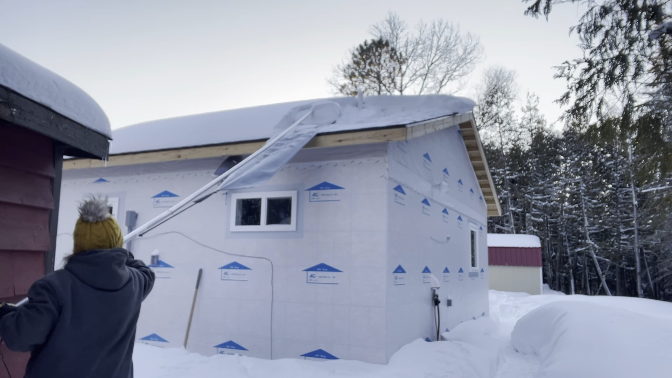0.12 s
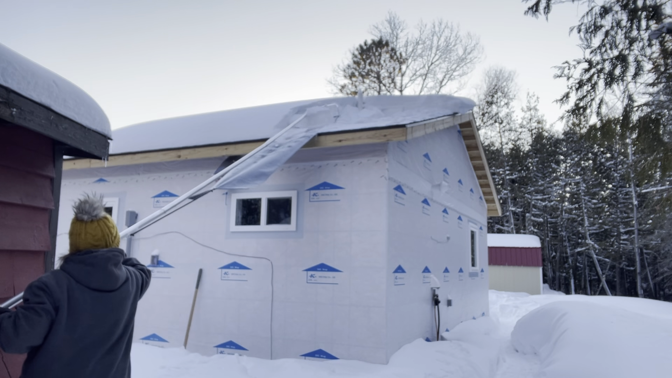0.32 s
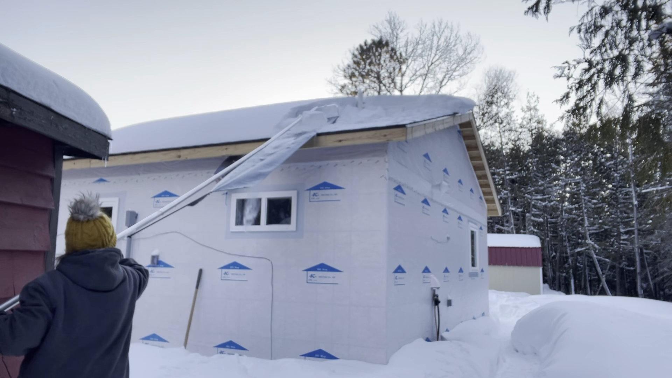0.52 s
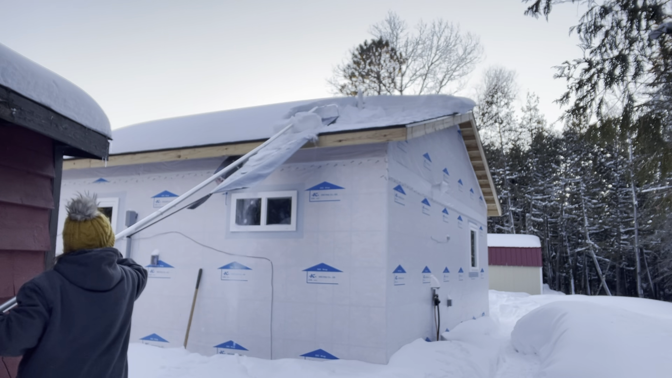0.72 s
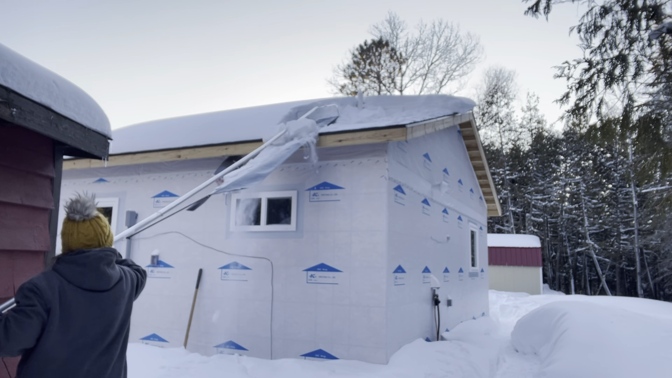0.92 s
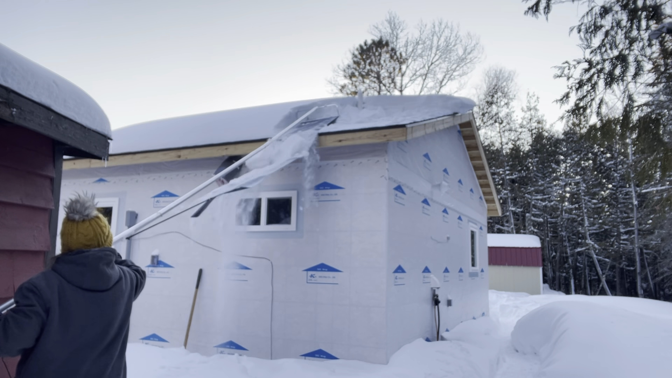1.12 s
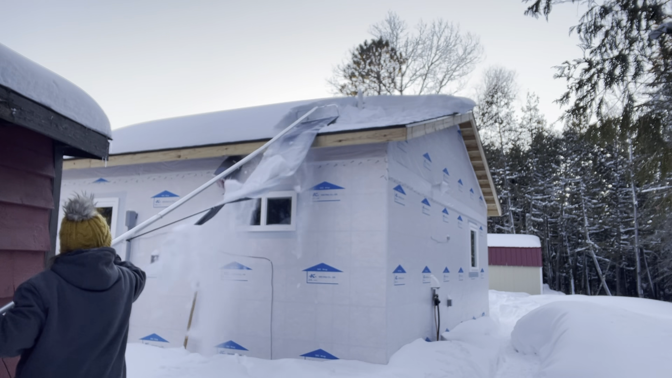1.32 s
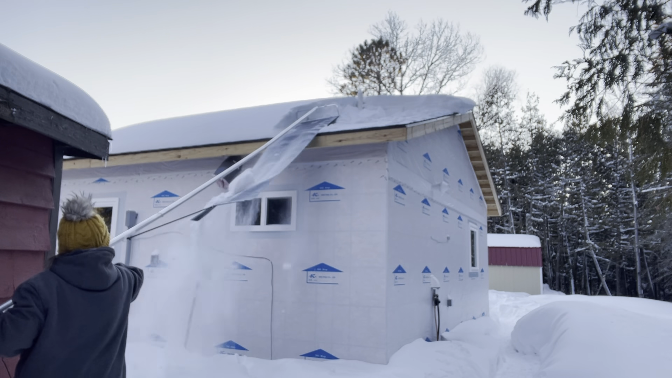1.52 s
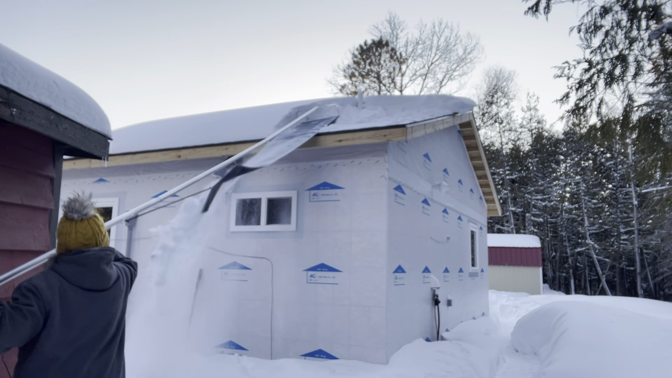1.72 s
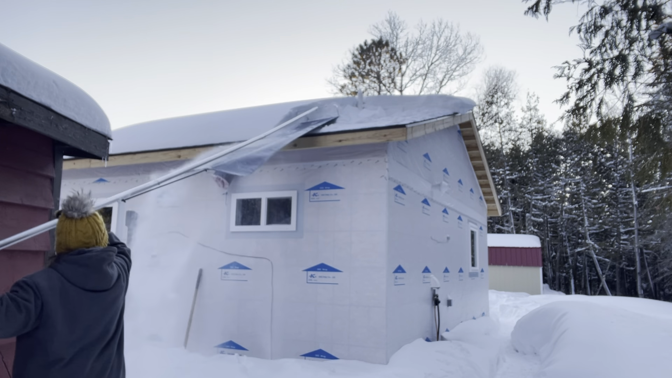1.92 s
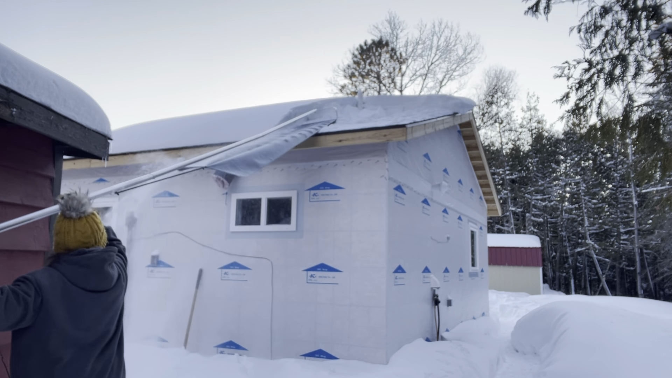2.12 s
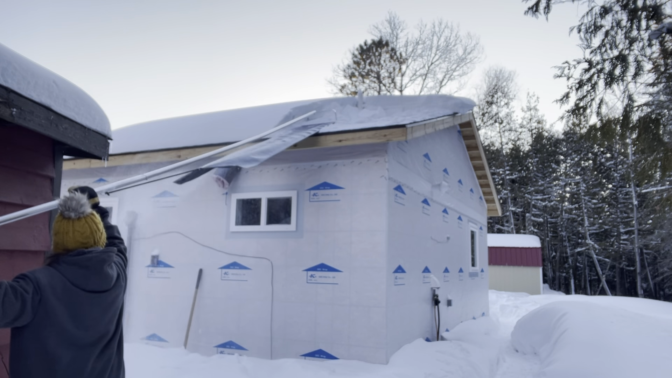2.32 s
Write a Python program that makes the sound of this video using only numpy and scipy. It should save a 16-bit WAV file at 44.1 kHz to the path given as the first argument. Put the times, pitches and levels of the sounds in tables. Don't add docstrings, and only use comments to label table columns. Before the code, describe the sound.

Snow slides down a roof rake's plastic tarp with a swelling hiss, then thumps softly down

```python
import sys
import numpy as np
from scipy import signal
from scipy.fft import rfft, irfft, next_fast_len
from scipy.io import wavfile
from scipy.ndimage import uniform_filter1d, map_coordinates

SR = 44100
rng = np.random.default_rng(int(sys.argv[2]) if len(sys.argv) > 2 else 0)


def wrap_up_sound(samples):
    columns = np.atleast_2d(samples).T
    tamed = np.clip(columns, -1, 1)
    steps = np.round(tamed * 32767).astype(np.int16)
    wavfile.write(sys.argv[1], SR, steps)


def gain_from_db(level_db):
    decades = np.asarray(level_db, float) / 20
    return 10 ** decades


N = 108045

# (frequency [Hz], level [dB])
AIR_SPECTRUM = [(18, -55), (30, -22), (60, -12), (110, -3.5), (170, -7), (300, -17), (700, -20),
                (2500, -29)]
# (frequency [Hz], t60 [s])
YARD_T60 = [(60, 0.18), (300, 0.089), (3000, 0.033)]
# (frequency [Hz], level [dB])
IMPACT_TILT = [(60, 1.3), (150, 2.2), (300, 4), (700, 3), (1500, .3), (4000, -.5)]
# (time [s], level [dB])
PATTER_LEVEL = [(1.5, -91), (1.6, -63.5), (1.74, -57), (1.82, -54), (1.9, -96), (2.04, -53), (2.17, -54),
                (2.27, -70), (2.45, -72)]
# (frequency [Hz], level [dB])
PATTER_SPECTRUM = [(20, -2), (45, 0), (80, -12), (200, -8), (400, -15), (800, -20), (2000, -88)]
# (frequency [Hz], likeness [0-1])
GROUND_LIKENESS = [(60, 0.73), (400, 1), (1000, 0.77), (3000, 0.7)]
# (time [s], level [dB], rise [s], fall t60 [s], left port early [ms])
LUMP_BURSTS = [
    (1.764, -43, 0.04, 0.06, -0.1),
    (1.982, -47, .003, 0.056, 0.39),
    (2.105, -48, 0.02, 0.08, 0.26),
    (2.13, -48, .03, .25, .26),
]
# (frequency [Hz], level [dB])
CRUNCH_SPECTRUM = [(60, -28), (200, -1), (700, -4), (1300, -15), (1900, -8), (2500, -11), (5500, -32),
                   (16000, -50)]
# (time [s], level [dB], rise [s], fall t60 [s], left port early [ms])
CRUMB_SPRAYS = [
    (.374, -47, .008, .07, 0.24),
    (2.118, -50, 0.025, .06, 0.28),
    (2.13, -47, 0.02, .075, 0.28),
    (2.32, -55.5, 0.085, 0.15, .25),
]
# (frequency [Hz], level [dB])
CRUMB_SPECTRUM = [(200, -23), (700, -2), (1500, 0), (3000, -4), (4100, -11), (5000, -25), (16000, -35)]
# (time [s], peak [dB], pitch [Hz], t60 [s])
LUMP_THUDS = [(1.43, -55.5, 70, 0.041), (1.597, -52.5, 55, 0.1), (1.709, -48, 70.6, .07),
              (1.733, -40.5, 68.7, 0.075), (1.755, -38, 136, 0.041), (1.786, -42.5, 55, 0.059),
              (1.86, -61, 55, .09), (1.911, -56, 65, .06), (1.965, -55, 60, 0.076), (2.008, -47, 55, .09),
              (2.058, -43, 97, 0.046), (2.069, -44, 62, .06), (2.094, -27.5, 158, 0.014),
              (2.104, -20, 60, 0.056), (2.1338, -35, 94, 0.069), (2.151, -54, 196, .04),
              (2.168, -53, 190, 0.033), (2.1745, -37, 58.4, .11), (2.19, -54.5, 218, .04),
              (2.215, -43, 55, 0.054), (2.239, -50, 70, .05), (2.284, -50, 60, 0.038), (2.34, -61, 55, .07),
              (2.41, -66, 70, .07)]
# (time [s], peak [dB], pitch [Hz], t60 [s], left port early [ms])
TARP_KNOCKS = [(.051, -39, 305, 0.048, 0.59), (0.172, -48, 240, 0.057, 0.29), (.372, -36.5, 1450, 0.033, 0),
               (.383, -42.5, 808, 0.084, -0.081), (.487, -49.5, 660, 0.064, 0),
               (0.511, -38, 1350, 0.032, 0), (.608, -35.5, 1550, 0.034, 0), (.645, -40, 1330, 0.046, 0),
               (.682, -39, 1446, .06, 0), (1.7522, -28, 640, .014, 0), (1.7535, -33, 300, .045, 0),
               (1.7515, -37, 1250, .035, 0), (1.757, -39, 900, .03, 0), (1.697, -33, 1940, .03, 0),
               (1.69, -44.5, 603, 0.069, 0), (1.7636, -32, 340, 0.067, 0.37), (1.763, -33, 1330, .045, 0),
               (1.764, -38, 800, .035, 0), (1.766, -39, 1750, .03, -0.047), (1.98, -26.5, 321, 0.019, 0.64),
               (1.977, -45, 600, 0.021, 0.27), (2.099, -39, 480, 0.063, .45), (2.124, -38, 431, 0.13, 0.49),
               (2.129, -40, 1040, 0.045, 0.28), (2.134, -42, 690, 0.027, 0.37),
               (2.268, -56, 770, .05, 0.16), (2.279, -56, 700, .04, .2), (2.29, -54, 800, 0.04, .25),
               (2.316, -42.5, 717, 0.045, 0.4)]
# (time [s], scrape level [dB], lowest tarp pitch [Hz], powder level [dB])
SLIDE_COURSE = [(0, -50.5, 244, -49), (0.2, -47, 204, -50), (.33, -46, 284, -49), (.4, -45, 594, -47.5),
                (.45, -45, 1010, -48), (.66, -44.5, 1250, -45.5), (.78, -42.5, 1120, -42.5),
                (.86, -44.5, 744, -41.5), (.93, -39, 840, -37.5), (1.04, -38.5, 660, -36.5),
                (1.2, -34.5, 494, -32), (1.4, -34.5, 533, -34), (1.59, -38, 554, -35.5),
                (1.68, -40.5, 296, -35.5), (1.755, -42.5, 200, -38.5), (1.82, -52, 420, -45),
                (1.97, -57, 478, -51), (2.45, -62.5, 980, -58)]
# (frequency [Hz], level [dB])
SCRAPE_SPECTRUM = [(60, -19), (200, -8), (1100, -1.5), (2200, -2), (4200, -3.5), (5500, -6), (7000, -11),
                   (16000, -41)]
# (frequency [Hz], likeness [0-1])
TARP_LIKENESS = [(60, 0.59), (400, 0.77), (800, 0.73), (1700, 0.97), (2500, 0.68), (5000, 1)]
# (time [s], focus [dB])
SCRAPE_FOCUS = [(0, -1), (.9, -2), (1.25, 4.5), (1.5, 5), (1.62, 1.5), (1.79, 3.5), (1.86, 1.5), (2.45, 5)]
# (frequency [Hz], gain per focus [dB/dB])
FOCUS_TILT = [(300, -1), (1100, 0.33), (2200, -0.4), (4000, -0.28), (6000, -0.56), (7200, -0.5)]
# (frequency [Hz], level [dB])
POWDER_SPECTRUM = [(300, -26), (2500, -10), (6000, -3), (8000, -0.5), (9500, -1), (11000, 0.5),
                   (14500, 2.5), (15900, 1.5)]
# (frequency [Hz], likeness [0-1])
POWDER_LIKENESS = [(1000, 0.85), (5500, 0.66), (7300, 0.94), (9500, 0.86), (11000, 1), (12200, 0.91),
                   (13500, 0.98), (15500, 0.81)]
# (frequency [Hz], early [ms])
POWDER_LEAD = [(5000, .078), (6500, .07), (7300, .0685), (8000, .0745), (9500, .0795), (11000, .082),
               (12300, .0812), (15500, .0832)]
# (time [s], level [dB])
POWDER_SCATTER = [(0, 0), (1.4, 0), (1.46, 3), (1.53, 3), (1.56, -10), (1.78, -10), (1.81, 3), (1.93, 4),
                  (1.95, -6), (1.985, -6), (2.01, 7), (2.17, 7), (2.2, -3), (2.25, 4), (2.45, 2)]

AIR_DB, YARD_DB, POWDER_DB = -69.5, -20, 3.5
GROUND_EARLY_MS, TARP_EARLY_MS, AIR_EARLY_MS = 0.57, -0.008, 0.21
THUD_RISE_S, KNOCK_RISE_S = 0.0023, 0.0014
THUD_DECAY_ORDER = 2
UPPER_MODE_RATIO, UPPER_MODE_DB = 1.7, -17
GRIT_PER_S, GRIT_DB, GRIT_HZ, GRIT_CYCLES, GRIT_SPREAD_DB = 1500, -10.5, 1494, 1.38, 3
EDGE_ORDER = 18
LEAK_DB, LEAK_ORDER, LEAK_HZ = -6.5, 0.7, 950
MIC_LOW_HZ, TOP_HZ = 38, 15800
TIME_S = np.arange(N) / SR


def unit(x):
    return x / np.sqrt(np.mean(x ** 2) + 1e-20)


def along(points, hz):
    f, value = np.transpose(points)
    return np.interp(np.log(hz + 1), np.log(f + 1), value)


def over_time(points, time_s=TIME_S):
    return np.interp(time_s, *np.transpose(points))


def wobble(knots_per_s):
    knots = rng.standard_normal(int(N * 40 / SR) + 4)
    return map_coordinates(knots, [TIME_S * knots_per_s])


def filtered(x, response):
    size = next_fast_len(N + SR // 2)
    return irfft(rfft(x, size) * response(np.fft.rfftfreq(size, 1 / SR)), size)[..., :N]


def rush(spectrum, patchy_db):
    z = signal.stft(rng.standard_normal((2, N)), nperseg=512)[2]
    patches = uniform_filter1d(rng.standard_normal(z.shape[1:]), size=6, axis=0)
    patches = uniform_filter1d(patches, size=10, axis=1)
    pair = signal.istft(z * gain_from_db(patchy_db * unit(patches)), nperseg=512)[1][:, :N]
    return unit(filtered(pair, lambda hz: gain_from_db(along(spectrum, hz))))


def ports(pair, likeness, early_ms):
    def share(hz):
        angle = np.arccos(np.clip(along(likeness, hz), 0, 1)) / 2
        return np.array([np.cos(angle), np.sin(angle)])

    def lead(hz):
        ms = early_ms if np.isscalar(early_ms) else along(early_ms, hz)
        return np.exp(np.outer([1j, -1j], np.pi * hz * ms / 1000))

    common, differing = filtered(pair, share)
    return filtered(np.array([common + differing, common - differing]), lead)


def air():
    swell = gain_from_db(AIR_DB + 1.2 * wobble(9))
    return ports(swell * rush(AIR_SPECTRUM, patchy_db=2.2), TARP_LIKENESS, AIR_EARLY_MS)


def yard(x):
    hz, t, z = signal.stft(rng.standard_normal((2, SR // 2)), SR, nperseg=256)
    decay = gain_from_db(-60 * t / along(YARD_T60, hz)[:, None])
    common, differing = signal.istft(z * decay, SR, nperseg=256)[1]
    tail = 0.58 * common + 0.25 * differing * np.array([[1], [-1]])
    tail = tail / np.linalg.norm(tail[0])
    delayed = np.pad(x.mean(axis=0), (500, 0))[None]
    return signal.fftconvolve(delayed, tail, axes=1)[:, :N]


def patter():
    level_db = over_time(PATTER_LEVEL) + 3 * wobble(25)
    noise = rush(PATTER_SPECTRUM, patchy_db=1.6)
    return ports(gain_from_db(level_db) * noise, GROUND_LIKENESS, GROUND_EARLY_MS)


def bursts(rows, spectrum):
    noise = gain_from_db(2.2 * wobble(38)) * rush(spectrum, patchy_db=2.2)
    out = np.zeros((2, N))
    for s, db, rise_s, t60_s, early_ms in rows:
        after_s = TIME_S - s
        shape_db = np.where(after_s < 0, 20 * after_s / rise_s, -60 * after_s / t60_s)
        out += ports(gain_from_db(db + shape_db) * noise, GROUND_LIKENESS, early_ms)
    return out


def rings(rows, rise_s, order=1):
    s, db, hz, t60_s, early_ms = np.transpose(rows)[..., None, None]
    t = np.maximum(TIME_S - s + early_ms * np.array([[1], [-1]]) / 2000, 0)
    envelope = gain_from_db(db - 60 * (t / t60_s) ** order) * (1 - np.exp(-t / rise_s))
    return np.sum(envelope * np.sin(2 * np.pi * hz * t), axis=0)


def thuds():
    rows = [(*row, GROUND_EARLY_MS) for row in LUMP_THUDS]
    return rings(rows, THUD_RISE_S, order=THUD_DECAY_ORDER)


def knocks():
    upper = [(s, db + UPPER_MODE_DB, hz * UPPER_MODE_RATIO, t60_s / 2, early_ms)
             for s, db, hz, t60_s, early_ms in TARP_KNOCKS]
    return rings(TARP_KNOCKS + upper, KNOCK_RISE_S)


def impacts():
    snow = patter() + bursts(LUMP_BURSTS, CRUNCH_SPECTRUM) + bursts(CRUMB_SPRAYS, CRUMB_SPECTRUM)
    mix = snow + thuds() + knocks()
    return filtered(mix, lambda hz: gain_from_db(np.outer([0.5, -0.5], along(IMPACT_TILT, hz))))


def grit():
    place, pitch, size, sign = rng.random((4, 2, int(GRIT_PER_S * N / SR)))
    hz = GRIT_HZ * 2 ** (3.2 * (pitch - 0.5))
    k = np.arange(256)
    cycles = hz[..., None] * k / SR
    peak = gain_from_db(-GRIT_SPREAD_DB * np.log(1 - size)) * np.sign(sign - 0.5)
    ticks = peak[..., None] * np.sin(2 * np.pi * cycles) * np.exp(-cycles / GRIT_CYCLES * 2)
    at = (place * N).astype(int)[..., None] + k
    return unit(np.array([np.bincount(i.ravel(), w.ravel(), N + 256)[:N] for i, w in zip(at, ticks)]))


def powder():
    s, _, _, level_db = np.transpose(SLIDE_COURSE)
    level_db = POWDER_DB + np.interp(TIME_S, s, level_db) + 0.4 * wobble(11)
    common, differing = rush(POWDER_SPECTRUM, patchy_db=0.8) * gain_from_db(level_db)
    pair = np.array([common, differing * gain_from_db(over_time(POWDER_SCATTER))])
    return ports(pair, POWDER_LIKENESS, POWDER_LEAD)


def scrape():
    s, level_db, edge_hz, _ = np.transpose(SLIDE_COURSE)
    noise = rush(SCRAPE_SPECTRUM, patchy_db=0.63) * gain_from_db(0.43 * wobble(4.34))
    rub = unit(noise + gain_from_db(GRIT_DB) * grit())
    hz, frame_s, z = signal.stft(rub, SR, nperseg=1024)
    ratio = np.minimum((hz[:, None] + 1) / np.interp(frame_s, s, edge_hz), 2)
    edge_power = 1 / (1 + ratio ** (-2 * EDGE_ORDER))
    leak = gain_from_db(LEAK_DB) * np.minimum(hz[:, None] / LEAK_HZ, 1) ** LEAK_ORDER
    sheet = np.sqrt(edge_power + leak ** 2)
    focus = gain_from_db(np.outer(along(FOCUS_TILT, hz), over_time(SCRAPE_FOCUS, frame_s)))
    rub = signal.istft(z * sheet * focus, SR, nperseg=1024)[1][:, :N]
    return ports(gain_from_db(np.interp(TIME_S, s, level_db)) * rub, TARP_LIKENESS, TARP_EARLY_MS)


def slide():
    return gain_from_db(0.25 * wobble(7.28)) * (scrape() + powder())


def scene():
    hits = impacts()
    return air() + gain_from_db(YARD_DB) * yard(hits) + hits + slide()


def low_pass(x):
    return signal.sosfilt(signal.butter(12, 15830, fs=SR, output="sos"), x)


def record(dry):
    heard = filtered(dry, lambda hz: hz ** 2 / (hz ** 2 + MIC_LOW_HZ ** 2) * (hz < TOP_HZ))
    return low_pass(heard)


dry = scene()
out = record(dry)
wrap_up_sound(out)
```